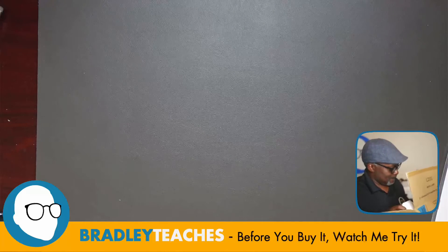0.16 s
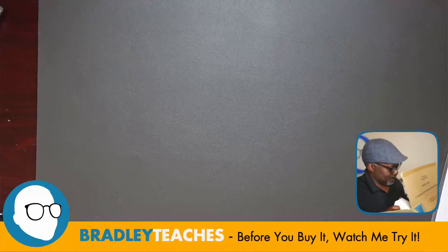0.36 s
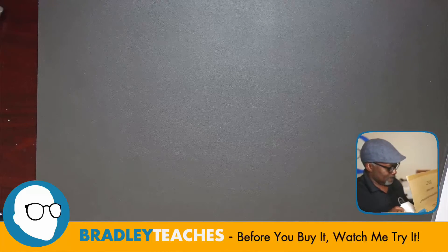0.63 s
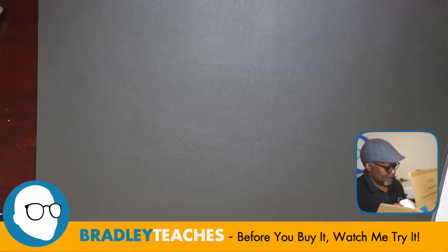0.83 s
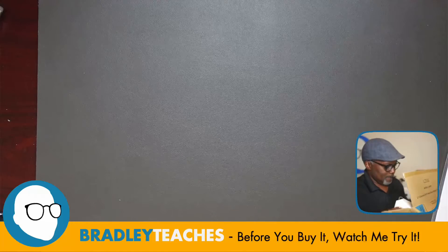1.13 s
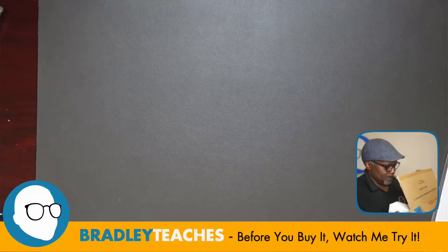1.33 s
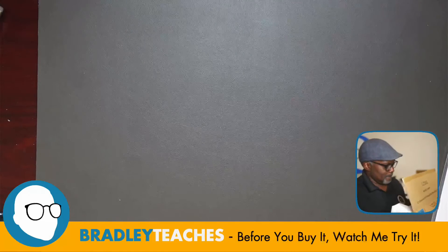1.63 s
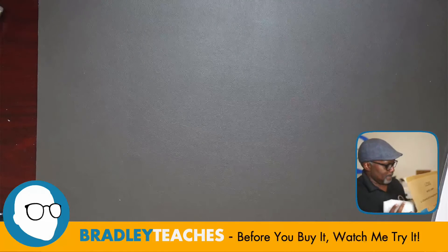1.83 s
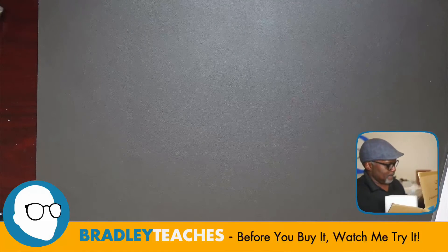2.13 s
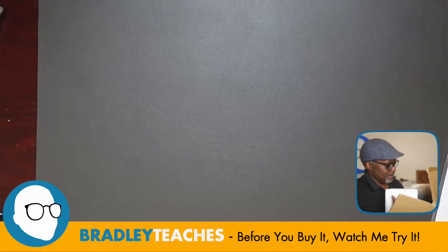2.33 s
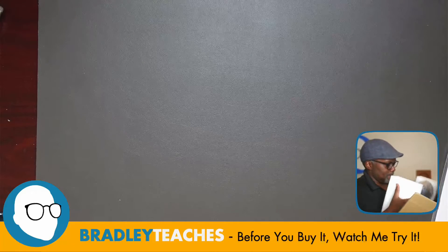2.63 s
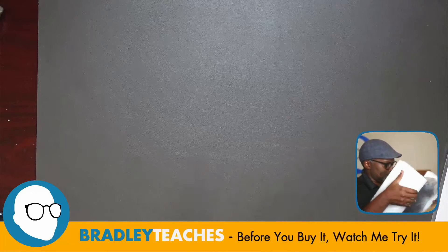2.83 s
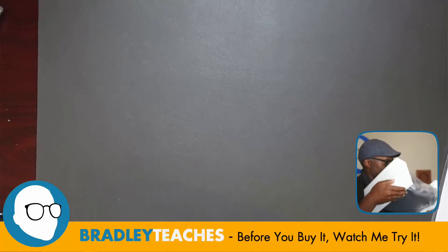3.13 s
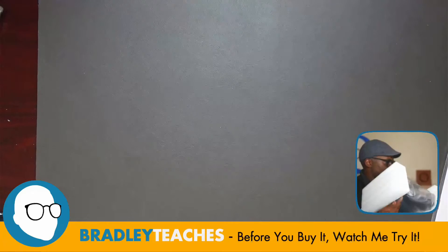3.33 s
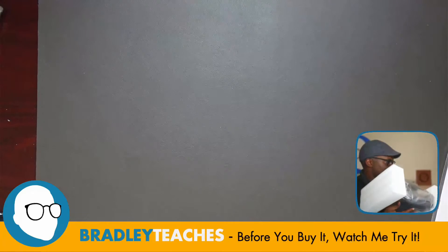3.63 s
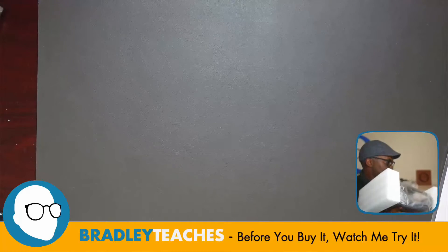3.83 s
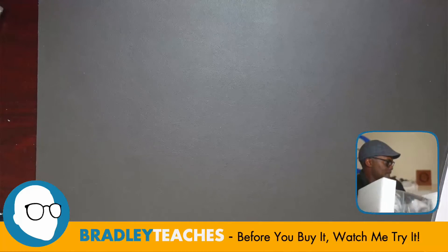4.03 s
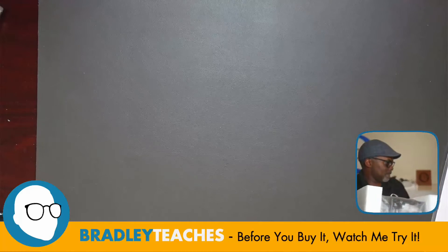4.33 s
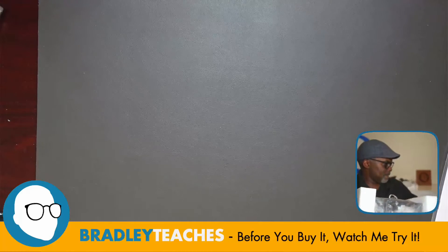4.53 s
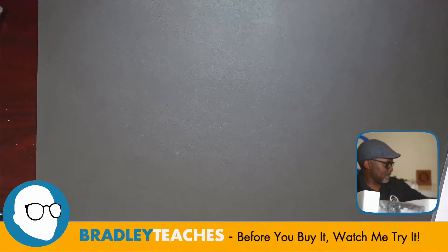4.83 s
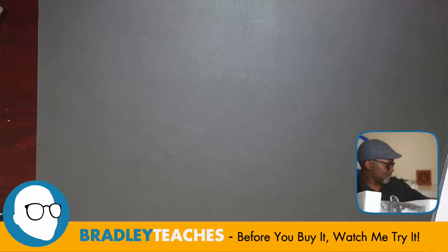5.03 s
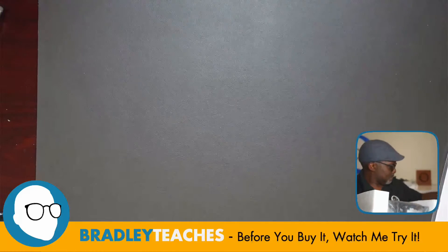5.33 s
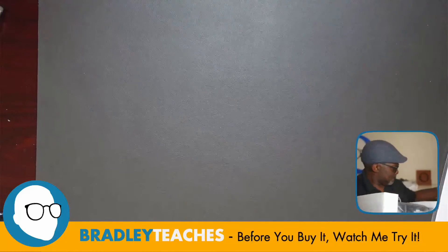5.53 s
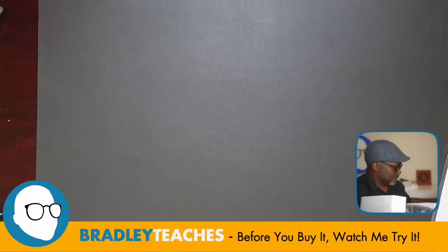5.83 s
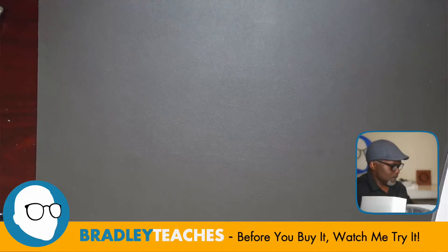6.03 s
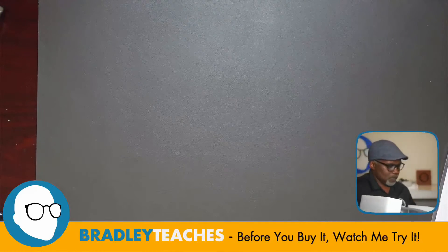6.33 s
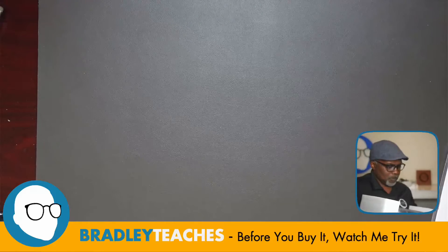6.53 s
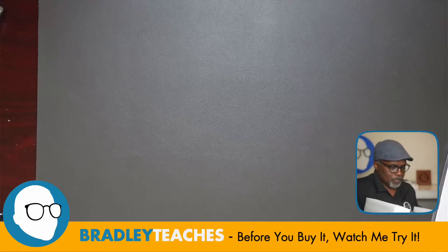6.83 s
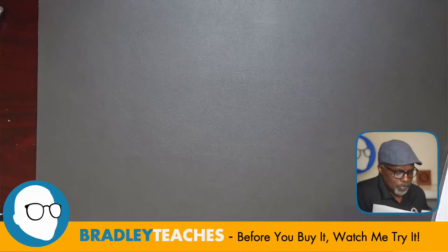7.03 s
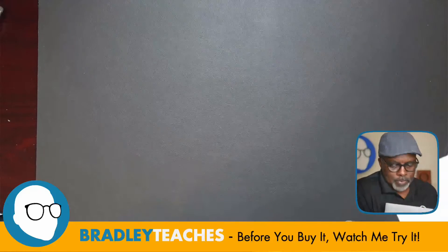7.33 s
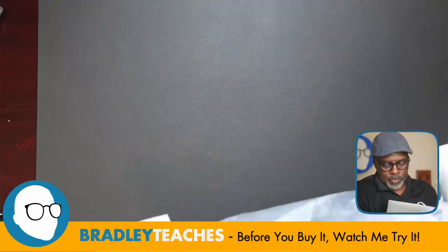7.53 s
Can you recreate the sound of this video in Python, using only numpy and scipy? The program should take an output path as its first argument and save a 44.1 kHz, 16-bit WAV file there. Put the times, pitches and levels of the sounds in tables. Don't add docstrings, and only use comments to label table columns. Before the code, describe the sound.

Foam packing is dragged from a cardboard box with rough rubs, crackling wrap and knocks, then one heavy thump on a desk.

```python
import sys
import numpy as np
from scipy import signal
from scipy.fft import rfft, irfft, next_fast_len
from scipy.io import wavfile
from scipy.ndimage import uniform_filter1d, map_coordinates

SR = 44100
rng = np.random.default_rng(int(sys.argv[2]) if len(sys.argv) > 2 else 0)


def gain_from_db(level_db):
    decades = np.asarray(level_db, float) / 20
    return 10 ** decades


def dump(signal):
    limited = np.clip(np.atleast_2d(signal).T, -1, 1)
    pcm = np.round(limited * 32767).astype(np.int16)
    wavfile.write(sys.argv[1], SR, pcm)


N = 338247

# f/Hz, density/dB
HISS_SPECTRUM = [(15, -51), (25, -10.5), (84, -4.5), (117, 0), (190, -15.5), (242, -3), (363, -18),
                 (863, -23.5), (1020, -25.5), (1480, -26.5), (2350, -28.5), (5140, -26), (16000, -30)]
# f/Hz, level/dB
MAINS_HUM = [(118.5, -52), (237, -61)]
# f/Hz, t60/s
ROOM_DECAY = [(100, 0.12), (500, 0.35), (2000, 0.42), (12000, 0.04)]
# f/Hz, rise/s
STAND_SWAY = (37.7, .022)
# t/s, level/dB, t60/s
STAND_JOLTS = [
    (2.1, -36, 0.36),
    (3.047, -2.5, 0.87),
    (3.34, -19, 0.77),
    (4.0, -30.5, 0.36),
    (4.63, -16, 0.67),
    (5.0, -40.5, 1),
    (6.6, -37, 0.55),
    (7.0, -30.5, 0.84),
    (7.455, -24, 0.54),
]
# f/Hz, width/Hz, depth/0-1
GRILLE_DIP = (5710, 250, 0.28)
# starts closing t/s, springs open t/s
GATE_PAUSES = [
    (5.36, 5.676),
    (6.03, 6.321),
]

# f/Hz, width/Hz, level/dB
DESK_MODES = [(70, 85, -14.5), (109, 15.6, -4), (172, 9.6, -2.5), (229.7, 14, -1.5), (269.2, 20, -4.5),
              (333, 70, -10), (398, 36, -5), (480, 65, -12)]
# f/Hz, width/Hz, level/dB
WALL_MODES = [(560, 250, -0.5), (928, 232, 4.5), (1068, 127, 3), (1393, 76, 6.5), (2050, 540, -16)]
# f/Hz, density/dB
FOAM_SPECTRUM = [(710, -45.5), (1200, 1.5), (1640, 0.5), (2130, -2.5), (2700, -1.5), (3870, 1.5),
                 (4990, -1.5), (5760, -5.5), (6260, -2.5), (6930, -9), (9000, -17), (11700, -24),
                 (19800, -120)]
# f/Hz, density/dB
FIZZ_SPECTRUM = [(3820, -19), (6500, -5.5), (6900, -10.5), (9480, -7), (11700, -15.5), (13900, -15),
                 (16000, -22)]

# t/s, peak level/dB, colour f/Hz
FOAM_SNAPS = [(0.0842, -28, 3600), (0.159, -26.5, 1860), (0.9163, -22.5, 4450), (1.0306, -7.5, 1750),
              (1.0944, -18.5, 1880), (1.1648, -14.5, 3620), (1.5544, -17, 1680), (2.1276, -13, 3670),
              (2.9537, -17, 1970), (3.04, -6, 3300), (3.3039, -16, 3860), (3.5874, -25, 6030),
              (3.5977, -17, 6400), (3.6172, -15.5, 8200), (3.8714, -20, 6070), (3.8911, -21, 2580),
              (3.9394, -20.5, 4110), (3.9764, -21, 3070), (3.9998, -19, 4970), (4.0587, -31.5, 8500),
              (4.2353, -21, 4890), (4.363, -14, 7450), (4.4223, -18, 8700), (4.4324, -19.5, 3585),
              (4.5501, -19, 4700), (4.6339, -20.5, 3200), (6.5939, -11, 4330), (7.0279, -21.5, 3520),
              (7.5951, -32.5, 3036)]
# t/s, peak level/dB, colour f/Hz
WRAP_TICKS = [(5.3358, -41, 4010), (5.4096, -35, 4775), (5.449, -40, 4000), (5.5478, -34, 5290),
              (5.556, -42, 4500), (5.6451, -36, 2940), (5.678, -29.5, 4950), (5.8067, -41, 2830),
              (5.8731, -35, 2083), (5.9005, -38, 2040), (6.0601, -32.5, 4480), (6.32, -43.5, 6660)]
# t/s, peak level/dB, colour f/Hz, swell/s
SHORT_SCUFFS = [(0.6426, -15.5, 4310, 0.0054), (0.7561, -15, 3570, 0.0054), (1.0238, -12, 1460, 0.0042),
                (1.487, -15, 4240, 0.0036), (1.5027, -34, 3740, 0.0043), (1.7602, -22, 3395, 0.0085),
                (2.087, -9.5, 4200, 0.0053), (2.3027, -46, 4440, 0.005), (3.2098, -13.5, 4830, 0.013),
                (3.3754, -17, 3530, 0.0049), (3.461, -10.5, 5430, 0.0052), (3.4746, -16, 3470, 0.0025),
                (3.5314, -19.5, 4270, 0.0031), (3.6643, -13, 5230, 0.0032), (3.7388, -20, 2600, 0.0058),
                (3.8488, -20, 4340, 0.005), (4.1305, -20.5, 2480, 0.01), (4.9523, -28, 6300, 0.005),
                (6.345, -32.5, 5320, 0.016), (6.5296, -23, 5930, 0.019), (6.6044, -12, 3600, 0.0059),
                (6.7126, -18, 4430, 0.0035), (7.2295, -21, 1880, 0.0063), (7.235, -27, 1777, 0.0067)]
# t/s, peak level/dB, colour f/Hz, swell/s
SLOW_SWISHES = [
    (3.855, -26.5, 1000, 0.015),
    (4.49, -29.5, 930, 0.02),
    (4.95, -28.5, 6500, 0.024),
    (4.95, -38, 3560, 0.027),
    (5.04, -29.5, 6270, 0.022),
    (5.04, -36.5, 5100, .02),
    (5.15, -38, 898, 0.017),
    (5.96, -45, 894, 0.015),
]

# t/s, peak level/dB, pitch f/Hz, desk ring re peak level/dB
SOFT_KNOCKS = [(0.563, -29.5, 178, -2), (0.639, -26, 172, -15), (0.76, -18, 216, -14),
               (0.858, -25.5, 83.5, -2), (1.028, -12.5, 161, -2), (1.165, -23, 172, -11),
               (1.246, -26, 215, -5), (1.447, -21, 207, -16), (1.561, -25, 167, -30),
               (1.8918, -5.5, 195, -12.5), (2, -18, 125, 0), (2.125, -5.5, 190, -14),
               (2.379, -21.5, 157, -19), (3.0384, 1, 218, -12), (3.213, -10.5, 110, -15),
               (3.253, -12, 100.6, -13), (3.734, -26.5, 164, 1), (3.954, -37, 241, 1),
               (4.047, -31, 99, -18), (4.487, -22, 107, 4.5), (4.634, -7.5, 197, -10.5),
               (4.699, -8, 199, -5), (5.177, -29.5, 256, 0.5), (5.767, -35, 117, -17.5),
               (6.598, -14, 115, -18), (6.708, -12, 170, -16), (6.718, -19, 115, -14),
               (6.935, -27.5, 93, 10.5), (7.026, -29.5, 81, -3), (7.226, -26, 232, -15)]
# t/s, peak level/dB, pitch f/Hz, desk ring re peak level/dB
EDGE_TAPS = [(.1590, -21, 1480, -14), (0.1607, -20.5, 650, -6), (.187, -29, 175, -7),
             (0.642, -25.5, 1490, -22.5), (.965, -26.5, 417, -17), (.9655, -24, 920, -17.5),
             (1.0316, 2.5, 1150, -20.5), (1.564, -11.5, 558, -7), (1.9989, -13, 480, -13),
             (2.129, -17.5, 1330, -3.5), (2.953, -18.5, 1870, -19.5), (3.0395, -9.5, 520, -20),
             (3.0402, -15, 1146, -19.5), (3.0402, -10.5, 1850, -17.5), (3.297, -21, 2670, -29.5),
             (3.3067, -9, 278, -8), (3.3075, -13.5, 810, -23), (3.3305, 0.5, 269, -7.5),
             (3.3328, -12, 596, -6), (3.3335, -21.5, 1500, -18), (3.346, -10, 187.4, -10),
             (3.3635, -18.5, 268, -14), (4.70, -17, 378, -5), (4.741, -14.5, 387.6, -0.5),
             (5.18, -34.5, 795, -17), (6.331, -48, 480, -10.5), (6.6, -14, 480, -30),
             (6.705, -16.5, 800, -13), (7.594, -32, 560, -16), (7.5955, -35, 1200, -10)]
# first t/s, peak level/dB, pitch f/Hz, gap/s, loss per bounce/dB
EDGE_ROCKING = [
    (1.609, -29, 194, .033, -0.5),
    (3.397, -16, 232, 0.056, 4),
]

# peak t/s, rub level/dB,
# rise/s, fall/s, box wall re rub level/dB
HAND_STROKES = [(0.0, -39, 0.083, 0.19, -2.5), (0.266, -26, .12, 0.27, -5.5), (.665, -33, 0.17, 0.17, -5.5),
                (.78, -37, 0.13, 0.35, -5), (.97, -42.5, 0.078, 0.18, 1), (1.05, -29.5, 0.045, 0.22, -2),
                (1.32, -29, 0.16, .15, -7), (1.49, -34, 0.051, 0.15, -11), (1.56, -37.5, 0.038, 0.11, 0),
                (1.881, -26.5, 0.17, 0.14, -8.5), (2.0, -37, 0.14, .2, -2), (2.09, -33.5, 0.16, 0.19, -7.5),
                (2.17, -45, 0.039, 0.21, -6), (2.348, -34, 0.087, 0.51, -6),
                (2.82, -37.5, 0.27, 0.22, -9.5), (2.971, -32.5, 0.039, 0.19, -8.5),
                (3.05, -26, 0.029, 0.21, -8), (3.21, -31, 0.14, 0.14, -3.5),
                 (3.33, -33, 0.0765, 0.27, -6.5), (3.47, -35.5, 0.061, 0.21, -7.5),
                 (3.67, -36, .045, 0.17, -1), (3.75, -40, 0.1, 1, -8), (3.87, -42.5, 0.082, 0.25, -4),
                 (4.17, -34.5, .3, 0.58, -8), (4.4, -41, 0.22, 0.083, -5), (4.64, -37.5, .04, 0.18, -5),
                 (4.719, -36, 0.15, 0.2, 4), (5.04, -45, 0.318, 0.24, -3.5), (5.72, -61, 0.21, 0.48, -21),
                 (5.96, -65, .2, 0.28, -1.5), (6.41, -39.5, .1, .4, -13.5),
                 (6.555, -33.5, 0.089, 0.1, -7.5), (6.605, -19.5, 0.023, .11, 2),
                 (6.66, -26, .08, .1, -4.5), (6.718, -27, 0.13, 0.18, -3), (6.95, -42.5, 0.17, 0.42, -3),
                 (7.14, -37.5, 0.35, 0.2, -7.5), (7.24, -30.5, 0.0315, .17, -8),
                 (7.45, -47, 0.3, 0.5, -1.5)]
# t/s, crinkly wrap level/dB, weight on the desk level/dB
HAND_GRIP = [(0, -1, 4), (.3, -9.5, -6.5), (.7, 3.5, 5), (1.3, -4, -2.5), (1.6, -1.5, 6.5), (1.85, 4, -3.5),
             (2.2, 3, 4.5), (2.9, -6, -3), (3.3, 6, 17), (4.25, 2.5, -5), (4.55, 7, 13), (5.05, 0.5, 10),
             (5.8, 0, 11), (6.4, -8.5, -1), (6.8, -4, 8.5), (7.25, -10, -2), (7.67, 3, 8)]

SNAP_T60_S, TICK_T60_S = 0.012, 0.0123


def unit(x):
    return x / np.sqrt(np.mean(x ** 2) + 1e-20)


def along(points, hz):
    f, value = np.transpose(points)
    return np.interp(np.log(hz + 1), np.log(f + 1), value)


def curves(rows):
    times, *columns = np.transpose(rows)
    return [np.interp(np.arange(N) / SR, times, column) for column in columns]


def wobble(rate):
    knots = rng.standard_normal(int(N * rate / SR) + 4)
    return map_coordinates(knots, [np.arange(N) * rate / SR])


def filtered(x, response):
    size = next_fast_len(len(x) + SR // 2)
    spectrum = rfft(x, size) * response(np.fft.rfftfreq(size, 1 / SR))
    return irfft(spectrum, size)[:len(x)]


def colour(spectrum):
    return lambda hz: gain_from_db(along(spectrum, hz))


def body(modes):
    def response(f):
        total = 0
        for k, (centre, width, db) in enumerate(modes):
            damping = 1j * f * width
            total = total + (-1) ** k * gain_from_db(db) * damping / (centre * centre - f * f + damping)
        return total
    return response


def add(x, s, sound):
    part = x[round(s * SR):][:len(sound)]
    part += sound[:len(part)]


def air():
    t, hum = np.arange(N) / SR, 0
    for hz, db in MAINS_HUM:
        level = gain_from_db(db - 0.5 + 1.5 * wobble(19))
        hum = hum + level * np.sin(2 * np.pi * hz * t + 0.7 * wobble(15))
    return hum + gain_from_db(-51.5) * unit(filtered(rng.standard_normal(N), colour(HISS_SPECTRUM)))


def room(x):
    hz, t, z = signal.stft(rng.standard_normal(SR // 2), SR, nperseg=256)
    decay = gain_from_db(-60 * t / along(ROOM_DECAY, hz)[:, None])
    tail = signal.istft(z * decay, SR, nperseg=256)[1]
    late = np.pad(x, (150, 0))
    return signal.fftconvolve(late, tail / np.linalg.norm(tail))[:N]


def stand():
    out, t = np.zeros(N), np.arange(SR * 2) / SR
    hz, rise = STAND_SWAY
    sway = (1 - np.exp(-t / rise)) * np.sin(2 * np.pi * hz * t + 4.0)
    for s, db, t60 in STAND_JOLTS:
        add(out, s, gain_from_db(db - 60 * t / t60) * sway)
    return out


def crackle(envelope, hz, width, click_db):
    tone = body([(hz, width * hz, 0), (5000, 8000, click_db)])
    noise = envelope * rng.standard_normal(len(envelope))
    burst = filtered(noise, lambda f: tone(f) / (1 + 1j * f / 9000) ** 2)
    return burst / np.abs(burst).max()


def snaps():
    out, t = np.zeros(N), np.arange(SR // 6) / SR
    for table, t60, width, click_db in ((FOAM_SNAPS, SNAP_T60_S, .35, -8), (WRAP_TICKS, TICK_T60_S, .6, -3)):
        envelope = gain_from_db(-60 * t / t60) * (1 - np.exp(-t / 0.00023))
        for s, db, hz in table:
            add(out, s, gain_from_db(db - 0.5) * crackle(envelope, hz, width, click_db))
    for table, width, click_db in ((SHORT_SCUFFS, .9, -11), (SLOW_SWISHES, .2, -26)):
        for s, db, hz, swell in table:
            u = t / swell
            add(out, s - .002, gain_from_db(db - 3.0) * crackle(u * np.exp(1 - u), hz, width, click_db))
    return out


def knocks():
    out, blows, t = np.zeros(N), np.zeros(N), np.arange(SR // 8) / SR
    bounces = [(s + k * gap, db - k * loss_db, hz, -12)
               for s, db, hz, gap, loss_db in EDGE_ROCKING for k in range(4)]
    # harder taps are briefer, dB per dB
    kinds = ((SOFT_KNOCKS + bounces, 1.2, 0, 2), (EDGE_TAPS, 0.63, 0.18, 1))
    for table, cycles, hardening, softness in kinds:
        for s, db, hz, ring_db in table:
            s = s + 0.4 / hz
            u = t * hz / cycles * gain_from_db(hardening * db)
            swell = (u * np.exp(1 - u)) ** softness
            add(out, s, -gain_from_db(db - 1.5) * swell * np.sin(2 * np.pi * hz * t))
            push = np.hanning(round(SR * .6 / hz) + 3)
            add(blows, s, -gain_from_db(db + ring_db + 50.0) * push / push.sum())
    return out + filtered(blows, body(DESK_MODES))


def shudder():
    out, t = np.zeros(N), np.arange(SR // 2) / SR
    fade_db = -12.5 - 60 * t / .3
    for s, db, _, ring_db in SOFT_KNOCKS:
        add(out, s, gain_from_db(db + 0.56 * ring_db + fade_db) * (1 - np.exp(-t / 0.0027)))
    return out


def strokes():
    t, power = np.arange(0, N + 64, 64) / SR, 0
    steepness_db, rounding, lightest_touch_db = 20.5, 1.346, -69
    for s, db, rise, fall, wall_db in HAND_STROKES:
        away = np.where(t < s, (s - t) / rise, (t - s) / fall)
        level_db = db - steepness_db * away ** rounding
        power = power + gain_from_db(level_db + np.array([[0], [wall_db]])) ** 2
    levels_db = 10 * np.log10(power + gain_from_db(lightest_touch_db) ** 2)
    return [np.interp(np.arange(N) / SR, t, level_db) for level_db in levels_db]


def friction(slips_per_s, spread_db, grain_db, flutter_db):
    slip = rng.random(N) < slips_per_s / SR
    sizes = gain_from_db(spread_db * np.minimum(rng.exponential(size=N), 2.5))
    grains = unit(slip * rng.choice([-1, 1], N) * sizes)
    rough = rng.standard_normal(N) + gain_from_db(grain_db) * grains
    return rough * gain_from_db(flutter_db * (wobble(25) + .7 * wobble(90)))


def patchy(x, depth_db):
    z = signal.stft(x, nperseg=256)[2]
    field = uniform_filter1d(rng.standard_normal(z.shape), size=5, axis=0)
    field = uniform_filter1d(field, size=12, axis=1)
    return signal.istft(z * gain_from_db(depth_db * unit(field)), nperseg=256)[1][:N]


def creasing():
    folds = (rng.random(N) < 60 / SR) * rng.exponential(size=N)
    decay = gain_from_db(-60 * np.arange(SR // 20) / SR / SNAP_T60_S)
    return 1 + gain_from_db(-2) * signal.fftconvolve(folds, decay)[:N]


def dragging(rub_db, weight_db):
    bumps = friction(slips_per_s=90, spread_db=0, grain_db=-0.5, flutter_db=0.0)
    modes = body(DESK_MODES)
    desk = lambda hz: modes(hz) / (1 + 1j * hz / 450) ** 2
    shake = gain_from_db(rub_db - 7.5 + weight_db) + shudder()
    shake = np.minimum(shake, gain_from_db(-6.5))
    drag = shake / np.std(filtered(bumps, desk))
    return filtered(drag * bumps, desk)


def rubbing():
    rub_db, wall_db = strokes()
    wrap_db, weight_db = curves(HAND_GRIP)
    slide = patchy(friction(slips_per_s=1500, spread_db=6, grain_db=-5.5, flutter_db=0.58), depth_db=2.0)
    foam = gain_from_db(rub_db) * unit(filtered(slide, colour(FOAM_SPECTRUM)))
    fizz_db = -48 + 0.68 * (rub_db + 38) + wrap_db
    fizz = gain_from_db(fizz_db) * unit(filtered(slide * creasing(), colour(FIZZ_SPECTRUM)))
    wall = gain_from_db(wall_db) * unit(filtered(slide, body(WALL_MODES)))
    return foam + fizz + wall + dragging(rub_db, weight_db)


def scene():
    hits = knocks() + snaps()
    slides = rubbing()
    reflections = room(gain_from_db(-9.5) * hits + gain_from_db(-20.0) * slides)
    return (hits + slides + reflections + stand() + air())[None]


def gate():
    t, shut = np.arange(N) / SR, 0
    for closes, opens in GATE_PAUSES:
        closing = np.clip((t - closes) / 0.117, 0, 1)
        still_shut = np.clip(1 - (t - opens) / .003, 0, 1) ** 2
        shut = shut + closing * still_shut
    return gain_from_db(-2.5 - 11 * shut)


def band_limit(x):
    return signal.sosfilt(signal.butter(12, 16450, fs=SR, output="sos"), x)


def record(dry):
    centre, width, depth = GRILLE_DIP
    heard = filtered(dry[0], lambda hz: 1 - depth * np.exp(-((hz - centre) / width) ** 2))
    gated = heard * gate()
    treble = filtered(gated, lambda hz: hz > 1500)
    sag = .44 * uniform_filter1d(np.abs(treble), size=500)
    held = (gated - sag) / (1 + np.abs(gated / .97) ** 8) ** (1 / 8)
    finished = filtered(held, lambda hz: hz < 15830)
    return band_limit(finished[None])


dry = scene()
out = record(dry)
dump(out)
```